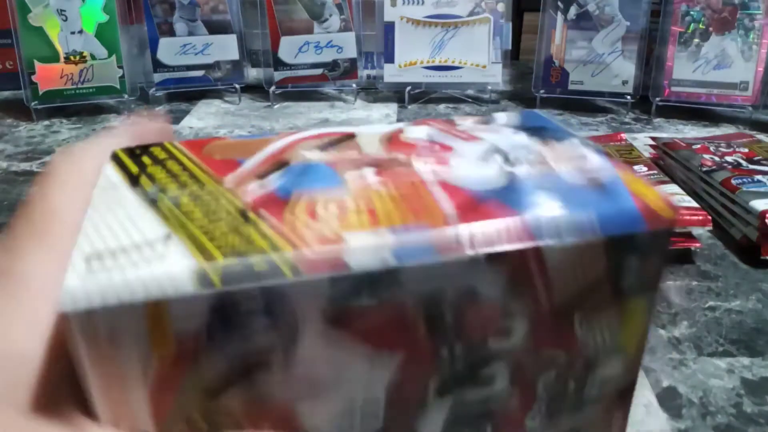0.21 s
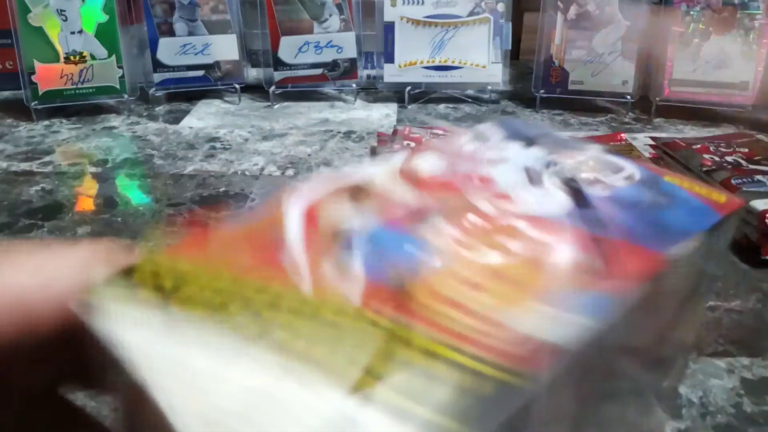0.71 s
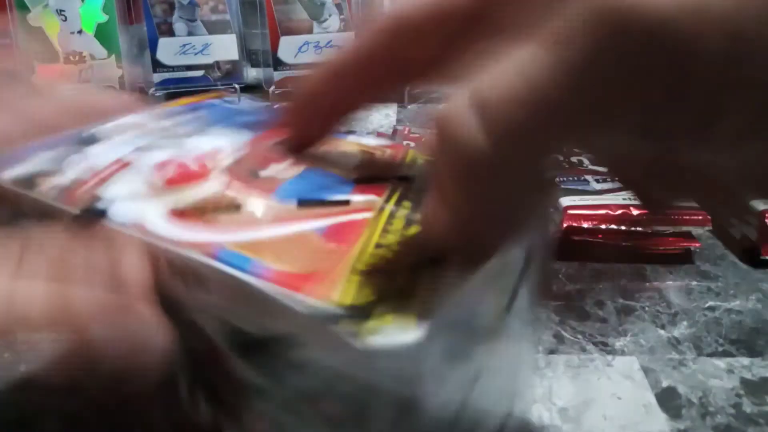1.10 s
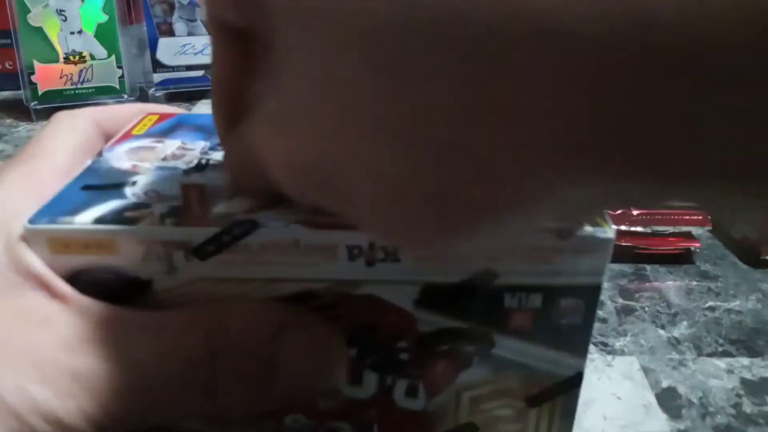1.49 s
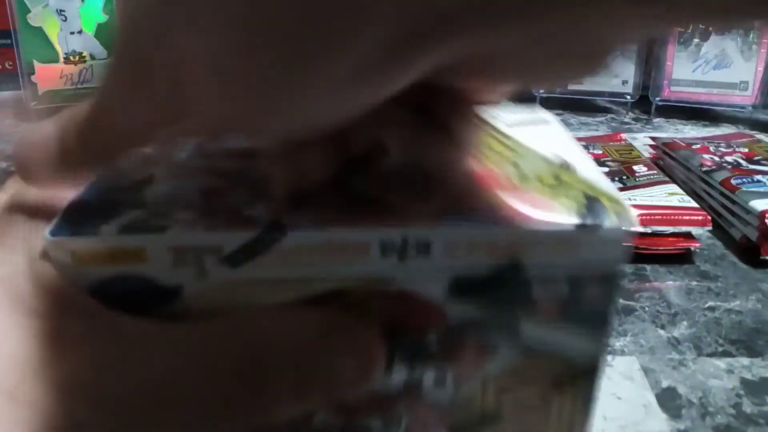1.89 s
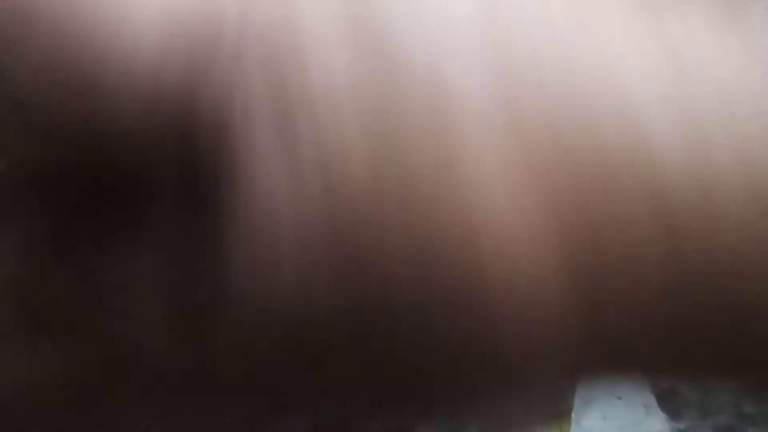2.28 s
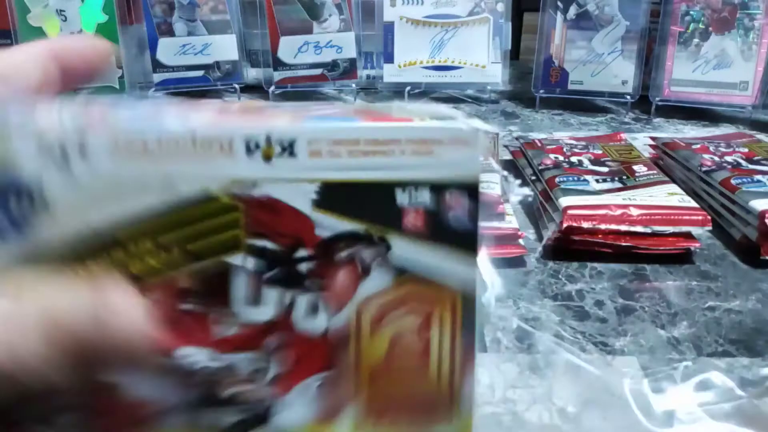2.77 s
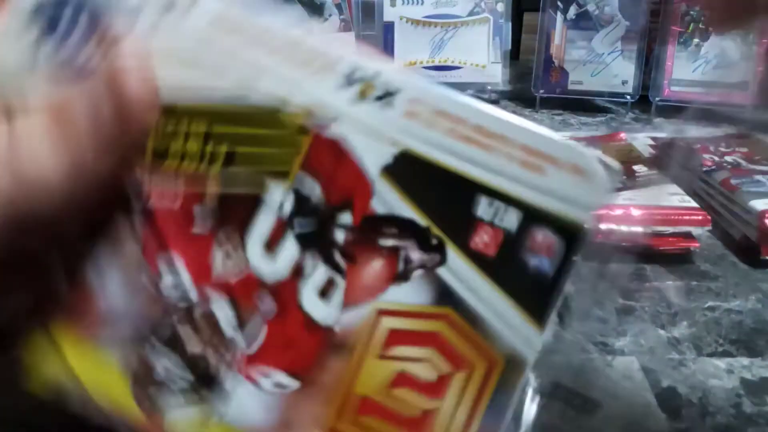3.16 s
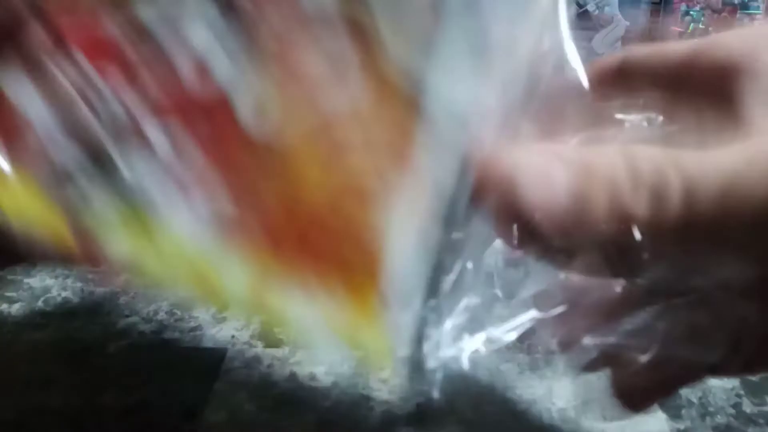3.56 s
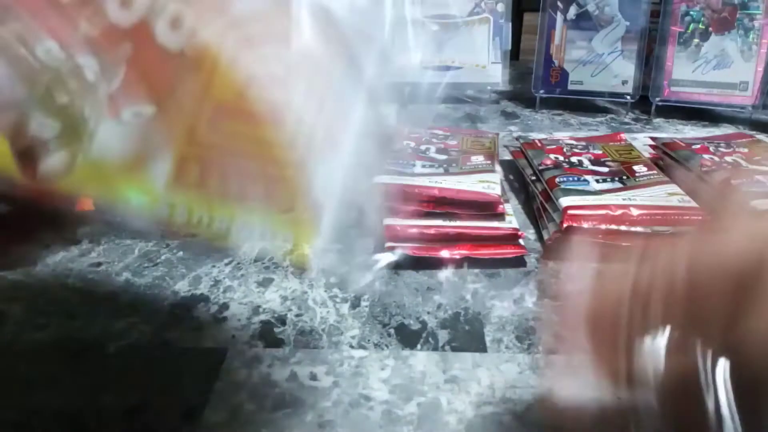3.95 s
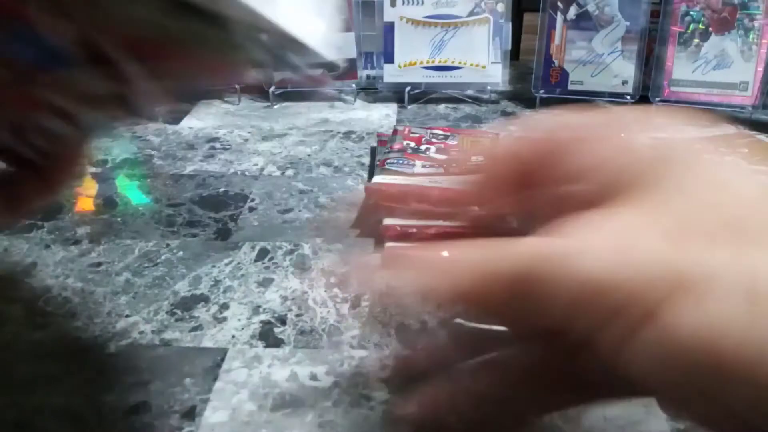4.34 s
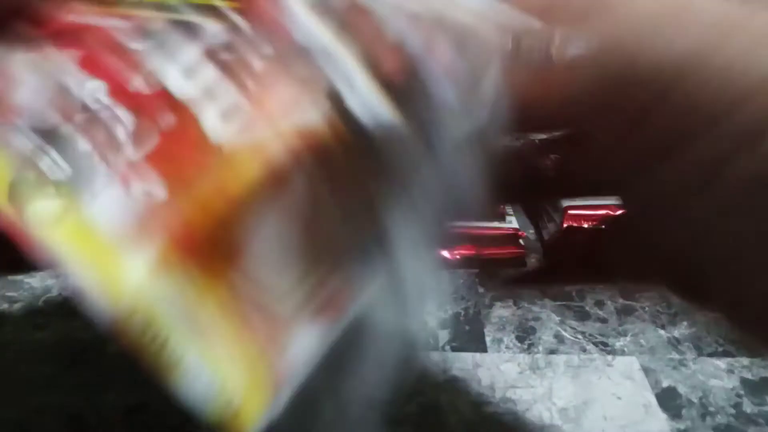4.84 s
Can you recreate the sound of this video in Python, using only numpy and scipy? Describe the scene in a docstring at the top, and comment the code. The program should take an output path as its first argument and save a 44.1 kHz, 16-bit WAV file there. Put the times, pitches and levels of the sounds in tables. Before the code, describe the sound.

Close hollow box taps and crinkles, a brief squeaky rub, then dense sharp crackling of torn plastic film, fading to sparse rustles.

```python
"""A stone table in a room with a short, dull tail; a phone microphone close to the hands.
Hands turn a film-wrapped cardboard box, pick at the film and tear it off: noise grains and short cracks
pass through resonances to make rustle, snaps and squeaks. Knocks, thumps, rubbing and sliding ring the
modes of lid and hollow box. Only the sharp hits wake the room; faint hiss lies behind,
and a noise suppressor pulls the pauses down."""
import sys
import numpy as np
from scipy import signal
from scipy.io import wavfile
from scipy.ndimage import uniform_filter1d

SR = 44100
rng = np.random.default_rng(int(sys.argv[2]) if len(sys.argv) > 2 else 0)


def dump(signal):
    """Clip the signal to [-1, 1] and save it as 16-bit WAV at the path in sys.argv[1]."""
    limited = np.clip(np.atleast_2d(signal).T, -1, 1)
    pcm = np.round(limited * 32767).astype(np.int16)
    wavfile.write(sys.argv[1], SR, pcm)


N = 222616
STEP = 32  # samples between two values of a slow curve

# pulls and slides of the film: [start t/s, hold t/s, rustle level/dB, sizzle level/dB, taut film f/Hz]
PULLS = [(0, .025, -42, -53.5, 4100), (0.048, 0.13, -56, -71, 5940), (0.294, .012, -68.5, -77, 2180),
         (0.335, 0.0062, -64, -100, 1890), (0.408, 0.011, -68, -93, 2210), (0.533, .012, -53.5, -82, 3100),
         (.578, 0.025, -47, -81.5, 2750), (0.626, .015, -43, -60, 2350), (0.678, .06, -55, -91, 2330),
         (.79, .04, -66, -68, 6100), (.835, 0.032, -55, -62, 3540), (0.877, 0.073, -46, -63, 2630),
         (0.958, 0.077, -54, -67, 3300), (1.067, 0.058, -56.5, -73, 5260), (1.176, 0.12, -64, -103, 4570),
         (1.324, .02, -57, -75, 3440), (1.383, .09, -60.5, -61.5, 4920), (1.51, .06, -72.5, -105, 4000),
         (1.592, 0.039, -54, -82, 2190), (1.828, 0.48, -52.5, -68.5, 4600), (2.414, .04, -64, -97, 3080),
         (2.462, 0.043, -56, -86, 3050), (2.496, 0.029, -45, -53, 3760), (2.575, .06, -65.5, -97, 4200),
         (2.627, .3, -54.5, -71.5, 3900), (2.975, .125, -47.5, -60, 4500), (3.15, 0.17, -57.5, -66.5, 4780),
         (3.334, .03, -54, -70, 4170), (3.39, 0.28, -68.5, -97, 5000), (3.637, .08, -58, -83, 4570),
         (3.734, .18, -50, -56, 4300), (3.967, .17, -60.5, -70, 3800), (4.156, 0.042, -47.5, -51.5, 4260),
         (4.251, 0.12, -73, -95, 5530), (4.361, 0.067, -55.5, -62.5, 4700), (4.456, 0.072, -73, -97, 5500),
         (4.549, 0.08, -58.5, -67, 5400), (4.639, 0.035, -62.5, -84, 5080), (4.872, 0.061, -71, -93, 5550),
         (4.981, 0.018, -59.5, -65, 5500), (5.024, 0.023, -53, -61, 3250)]
# loud film creases letting go: [t/s, peak level of the body/dB, pitch f/Hz]
SNAPS = [(0.0235, -28.5, 2070), (.0905, -23, 5110), (0.3073, -51, 5800), (0.339, -39, 5100),
         (0.5286, -28, 1520), (0.5763, -15.5, 3580), (0.6377, -22.5, 4830), (0.6412, -21, 2210),
         (0.7211, -30.5, 2760), (1.111, -37.5, 5700), (1.1806, -41.5, 2540), (1.3308, -36, 3420),
         (1.6236, -33, 2153), (1.818, -43.5, 4360), (1.8447, -26.5, 1910), (1.9441, -16.5, 4290),
         (1.9966, -37.5, 4400), (2.016, -31.5, 1590), (2.021, -27, 2310), (2.0836, -27, 5600),
         (2.0963, -26, 4050), (2.1445, -33.5, 2080), (2.203, -33.5, 3520), (2.2099, -22.5, 5200),
         (2.2647, -22.5, 3380), (2.276, -25.5, 2460), (2.3062, -37.5, 2700), (2.3315, -36, 4540),
         (2.4258, -35, 2420), (2.468, -34, 2660), (2.4931, -36, 3270), (2.508, -29, 1520),
         (2.5157, -19, 4800), (2.5237, -22, 2780), (2.545, -25.5, 5800), (2.6336, -35, 4440),
         (2.6794, -22, 2260), (2.762, -28.5, 3170), (2.7743, -27.5, 2800), (2.8, -35.5, 1880),
         (2.8692, -27, 5870), (2.9081, -32, 4700), (2.9708, -34.5, 3700), (2.976, -23.5, 5150),
         (2.997, -23, 5200), (3.0298, -25, 4730), (3.0573, -28.5, 5750), (3.0788, -29.5, 1530),
         (3.1008, -17, 4880), (3.2823, -32, 5800), (3.385, -40, 1620), (3.475, -48.5, 3290),
         (3.54, -52.5, 6300), (3.5639, -46, 6100), (3.6161, -40.5, 6100), (3.655, -41.5, 3400),
         (3.7308, -33, 5630), (3.7683, -28, 5770), (3.825, -34, 4010), (3.8385, -31, 3100),
         (3.884, -28, 5270), (3.8908, -25, 4870), (3.8993, -27, 6300), (3.9074, -27.5, 2520),
         (3.9247, -34.5, 2460), (3.9604, -41, 2200), (3.976, -49, 4500), (3.9854, -39, 2340),
         (4.0075, -37, 4600), (4.029, -41.5, 2970), (4.042, -44, 5640), (4.059, -45.5, 4840),
         (4.0833, -37, 3600), (4.1101, -39, 5260), (4.151, -50, 5150), (4.2029, -24.5, 6150),
         (4.3747, -43.5, 5900), (4.433, -43, 3980), (4.448, -42, 5250), (4.549, -40.5, 6020),
         (4.5963, -35, 5580), (4.6369, -45, 3220), (4.6858, -48.5, 2970), (5.031, -27, 1600)]
# middle sizzle of a snap against its body peak: [t/s, level/dB]
CRISPNESS = [(0, 12), (.1, -10.5), (.5, -31), (1.7, -29), (1.9, -23.5), (2.35, -10.5), (2.45, -52),
             (2.55, -47), (2.85, -5.5), (3.3, -26), (3.5, 2), (3.7, -10), (4.0, -5), (4.15, -8.5),
             (4.6, -5.5), (5.0, -39)]
# taps on the lid and sides: [t/s, peak level/dB, struck panel f/Hz]
KNOCKS = [(0.0148, -37, 1020), (0.026, -26, 1160), (0.091, -32.5, 1020), (0.292, -32.5, 1270),
          (0.303, -27.5, 1220), (0.331, -38, 814), (0.3381, -26, 1160), (0.348, -35, 1290),
          (0.373, -40.5, 900), (0.4112, -21.5, 630), (0.458, -45.5, 890), (0.529, -32.5, 865),
          (0.6446, -18, 830), (0.6553, -31.5, 480), (0.8902, -19.5, 730), (0.9019, -17, 530),
          (1.0242, -29, 650), (1.1176, -32.5, 715), (1.3867, -30, 775), (1.465, -35.5, 895),
          (1.5928, -40.5, 665), (1.6213, -25.5, 900), (1.8447, -27.5, 553), (1.944, -26.5, 530),
          (2.024, -22.5, 975), (2.0593, -26, 782), (2.2055, -31.5, 774), (2.2134, -27, 750),
          (2.268, -32.5, 825), (2.516, -26.5, 1340), (2.5334, -25.5, 1160), (2.5442, -44.5, 410),
          (2.6326, -32.5, 860), (2.68, -19, 910), (2.9722, -35.5, 740), (2.9966, -31, 670),
          (3.0344, -30, 1230), (3.102, -23.5, 720), (3.3339, -20.5, 537), (3.8907, -35, 740),
          (4.2036, -37.5, 595), (5.0276, -34, 620), (5.0325, -26.5, 660)]
# the whole box bumping table or palm: [t/s, peak level/dB, pitch f/Hz, settling t/s]
THUMPS = [(0.024, -37, 328, 0.037), (0.094, -46.5, 210, 0.12), (0.412, -39, 264, 0.17),
          (0.528, -37.5, 210, 0.07), (0.601, -43.5, 110, 0.071), (0.64, -28, 195, 0.15),
          (0.796, -43.5, 234, 0.042), (0.897, -26.5, 239, 0.063), (0.948, -27, 226, 0.12),
          (1.18, -37.5, 200, 0.08), (1.332, -33, 267, 0.068), (1.586, -37.5, 226, 0.087),
          (1.612, -39.5, 298, 0.049), (2.542, -33, 273, 0.08), (2.872, -42, 94, 0.15),
          (2.913, -42, 100, 0.08), (2.976, -38, 277, 0.08), (3.099, -39.5, 171, 0.11),
          (3.334, -29.5, 194.4, 0.2), (3.765, -43, 228, 0.15), (3.898, -36, 167, 0.091),
          (4.145, -43, 187, 0.067), (4.166, -40, 129, 0.2), (4.222, -34.5, 370, 0.06),
          (4.225, -37, 133, 0.081), (4.651, -38.5, 163, 0.22), (5.028, -33, 120, 0.092)]
# fingers rubbing the lid: [start t/s, hold t/s, level/dB, pressed lid f/Hz]
RUBS = [(0, 0.017, -43.5, 750), (0.072, 0.095, -66, 1090), (0.533, .055, -56.5, 760),
        (0.679, 0.056, -53, 900), (0.746, 0.058, -69, 606), (0.844, .04, -53, 595),
        (0.883, 0.072, -36, 473), (0.94, 0.2, -50, 820), (1.16, 0.17, -58.5, 690), (1.327, .012, -42, 740),
        (1.37, 0.18, -62.5, 780), (1.585, 0.027, -43, 880), (1.84, 0.013, -38.5, 604),
        (1.884, 0.25, -49.5, 790), (2.189, 0.022, -53, 750), (2.416, 0.086, -68, 850),
        (2.508, 0.035, -43.5, 826), (2.634, 0.022, -50.5, 758), (2.751, 0.16, -52.5, 1020),
        (2.966, 0.14, -51, 730), (3.13, 0.039, -55.5, 900), (3.336, 0.009, -40.5, 520),
        (3.374, 0.045, -61.5, 696), (3.62, .1, -76.5, 1300), (3.744, 0.17, -57.5, 650),
        (4.163, 0.036, -49, 576), (4.33, 0.083, -78.5, 1250), (4.655, 0.017, -63, 450)]
# the box shifting on the table: [start t/s, hold t/s, level/dB]
SHIFTS = [(0, .02, -51), (.06, 0.086, -60.5), (.535, 0.08, -54.5), (.642, 0.0074, -40.5), (.7, 0.041, -65),
          (.85, 0.024, -46), (.9, 0.081, -37.5), (.98, 0.12, -58.5), (1.15, .4, -78), (1.9, 0.077, -72.5),
          (1.99, 0.31, -77), (2.465, 0.032, -67), (2.51, 0.021, -55), (2.64, 0.015, -64.5),
          (2.85, .14, -66), (3.01, 0.13, -52), (3.715, 0.16, -70), (4.16, 0.076, -53),
          (4.648, 0.042, -57.5), (4.88, 0.17, -84.5)]
# narrow tones of sliding film or card: [from t/s, to t/s, pitch f/Hz, resonator width f/Hz, top level/dB]
SQUEAKS = [(.84, 1.06, 1740, 110, -55), (.865, 1.0, 2160, 120, -56), (.86, 1.05, 2910, 170, -51),
           (.828, 1.06, 3480, 170, -53), (3.34, 3.63, 4850, 900, -63), (1.63, 1.77, 890, 120, -70),
           (2.335, 2.47, 910, 150, -66), (3.634, 3.665, 1365, 120, -61), (4.23, 4.4, 1460, 90, -72),
           (4.866, 4.99, 1720, 300, -70), (4.866, 4.9, 1800, 150, -63), (4.866, 4.97, 4750, 250, -75),
           (4.866, 4.95, 452, 60, -75)]
# modes of the lid, then of the hollow box: [f/Hz, relative level/dB, free ringing to -60 dB t/s]
LID_MODES = [(487, -12.5, 0.023), (549.4, 2.5, 0.11), (708, 4, 0.043), (792, 8, 0.047), (991, 0.5, 0.047),
             (1254, 1.5, 0.08)]
HOLLOW_MODES = [(89.1, -21, 0.54), (120.4, -12.5, 0.21), (207.2, -10, .14), (230, 1.5, 0.061),
                (297, 2.5, 0.11)]
# crossovers between the bands of the suppressor: [f/Hz]
SUPPRESS_EDGES_HZ = [380, 1300, 3500, 8000]

# every move swells, holds and dies away: (swell dB per s, dying dB per s, level at rest dB)
PULL_SHAPE, SIZZLE_SHAPE = (1600, 298, -93), (2400, 650, -105)
RUB_SHAPE, SHIFT_SHAPE = (1800, 420, -96.5), (790, 330, -91)
# a hit leaves its own friction sound going for a moment: (dB under the hit, dying dB per s)
AFTER_SNAP, AFTER_KNOCK, AFTER_THUMP = (26.7, 550), (21, 1800), (16, 400)
SLACK_FILM_HZ, RESTING_LID_HZ = 5400, 1200
CRISPNESS_SPREAD_DB = 7.5  # standard deviation from snap to snap
# small random snaps, only while the film is torn and pulled hard enough
TICKS_PER_S, TICK_OVER_RUSTLE_DB, TICK_SPREAD_DB = 40, 9, 7
TEARING_FROM_S, TICKS_ABOVE_DB = 1.82, -63
# microphone port (width of each of two stages), low limit of the microphone, top cut
PORT_HZ, PORT_WIDTH_HZ, PORT_DB = 15000, 2300, 11.5
MIC_LOW_HZ, CUTOFF_HZ = 69.4, 16300
ROOM_T60_S, ROOM_DB, HISS_DB = 0.11, -18.5, -99
# suppressor: threshold, extra dB down per dB under it, smoothing time
SUPPRESS_BELOW_DB, SUPPRESS_SLOPE, SUPPRESS_S = -88, 0.11, .015


def rustle(body_db, sizzle_db, taut_hz):
    """Creases over smooth sliding ring flickering patches of film, those near the taut pitch most."""
    # harder handling crackles more and rings patches further from the taut pitch
    crackle = np.clip((body_db + 72) / 22, .2, 1)
    creases = crackle * grains(per_s=380, spread_db=4.2, grain_s=.0007)
    sliding = rng.standard_normal(N)
    friction = creases + .6 * sliding
    body = np.zeros(N)
    for k, hz in enumerate(np.geomspace(1350, 6600, 14)):
        near_db = nearness_db(hz, taut_hz, db_per_octave=11.5 - 8.8 * crackle)
        flicker_db = 4.1 * drift(per_s=14.0)
        patch = rms_one(resonate_twice(friction, hz, 0.19 * hz))
        body += (-1) ** k * from_db(near_db + flicker_db) * patch
    return from_db(body_db) * evened(body) + from_db(sizzle_db) * evened(sizzle(friction))


def snaps(table):
    """A crease gives way in under a millisecond with a pitch of its own, then rattles for a few more."""
    out, t = np.zeros(N), np.arange(700) / SR
    crispness_draws = rng.standard_normal(len(table))
    noise = rng.standard_normal((len(table), len(t)))
    onset = 1 - np.exp(-t / 0.00029)
    shape = onset * (np.exp(-t / 0.00026) + .12 * np.exp(-t / 0.0028))
    for (s, db, hz), white, draw in zip(table, noise, crispness_draws):
        crack = white * shape
        pitched = 5.8 * resonate(crack, hz, 0.12 * hz)
        body = band(band(crack, 1100, 4700) + pitched, 1100, 6000)
        sizzle_db = db + crispness_db(s) + CRISPNESS_SPREAD_DB * draw
        add(out, s, from_db(db) * peak_one(body) + from_db(sizzle_db) * peak_one(sizzle(crack)))
    return out


def ticks(film_db):
    """Small snaps at random moments, sized by the rustle around them."""
    when, size, pitch, chance = rng.random((4, 400))
    at = (when * N).astype(int)
    db = film_db[at] + TICK_OVER_RUSTLE_DB + TICK_SPREAD_DB * (2 * size - 1)
    hz = 1800 * 4.5 ** pitch
    chosen = chance < TICKS_PER_S * N / SR / len(chance)
    heard = chosen & (at > TEARING_FROM_S * SR) & (film_db[at] > TICKS_ABOVE_DB)
    return list(zip(at[heard] / SR, db[heard], hz[heard]))


def sizzle(x):
    """The treble from 6.8 kHz up, lifted at the resonance of the microphone port."""
    return band(x, 6800, 21000) + from_db(PORT_DB) * resonate_twice(x, PORT_HZ, PORT_WIDTH_HZ)


def crispness_db(s):
    """Middle sizzle of a snap against its body peak at a given time."""
    return np.interp(s, *np.transpose(CRISPNESS))


def blows(table, modes, share, softness, grit):
    """A contact of under one cycle, then gritty settling, rings the struck panel and modes near its pitch."""
    out, t = np.zeros(N), np.arange(round(.25 * SR)) / SR
    strengths = from_db(rng.normal(0, 3.5, (len(table), len(modes))))
    noise = rng.standard_normal((len(table), len(t)))
    for (s, db, hz, settle_s), gains, white in zip(table, strengths, noise):
        push = grit * white * np.exp(-np.log(1000) * t / settle_s)
        width = max(round(softness * SR / hz), 3)  # softness is the contact in cycles
        push[:width] += np.hanning(width)
        sound = ring(push, hz, 9.4 / hz)
        for (mode_hz, mode_db, mode_t60), gain in zip(modes, gains):
            near_db = nearness_db(mode_hz, hz, db_per_octave=5.0)
            sound += share * gain * from_db(mode_db + near_db) * ring(push, mode_hz, mode_t60)
        add(out, s, from_db(db) * peak_one(band(sound, 0.47 * hz, 2.7 * hz)))
    return out


def knocks():
    """Taps ring the lid modes and settle in 24 cycles of the struck panel."""
    table = [(s, db, hz, 24.0 / hz) for s, db, hz in KNOCKS]
    return blows(table, LID_MODES, share=0.063, softness=0.4, grit=0.52)


def thumps():
    """Softer, grittier contacts of the whole box ring its hollow modes."""
    return blows(THUMPS, HOLLOW_MODES, share=0.3, softness=.6, grit=1.6)


def rubbing(lid_db, lid_hz):
    """Uneven slips of skin on card ring the lid modes, damped, most those near the pressed pitch."""
    skin = grains(per_s=220, spread_db=1.0, grain_s=0.0032)
    lid = np.zeros(N)
    for hz, db, t60 in LID_MODES:
        near_db = nearness_db(hz, lid_hz, db_per_octave=28.0)
        lid += from_db(db + near_db) * rms_one(ring(skin, hz, 0.21 * t60))
    return from_db(lid_db) * evened(band(lid, 570, 1400))


def shifting(shift_db):
    """Steady friction of card on stone rings the hollow modes, damped, each drifting in level."""
    stone = rng.standard_normal(N)
    hollow = np.zeros(N)
    for hz, db, t60 in HOLLOW_MODES:
        hollow += from_db(db + 7.3 * drift(per_s=5.2)) * ring(stone, hz, 0.38 * t60)
    return from_db(shift_db) * evened(band(hollow, 65, 570))


def squeaks():
    """Friction noise through a narrow resonance; it catches quickly and lets go slowly."""
    out = np.zeros(N)
    for start, stop, hz, width_hz, db in SQUEAKS:
        phase = np.linspace(0, 1, round((stop - start) * SR))
        white = rng.standard_normal(len(phase))
        tone = rms_one(resonate_twice(white, hz, width_hz))
        add(out, start, from_db(db) * np.sin(np.pi * phase ** 0.45) ** .7 * tone)
    return out


def room(x):
    """A short dying tail of reflections, dull on top, starting 4 ms after the direct sound."""
    t = np.arange(round(.3 * SR)) / SR
    reflections = band(rng.standard_normal(len(t)), 150, 9800)
    tail = reflections * from_db(-60 * t / ROOM_T60_S) * (t > .004)
    return from_db(ROOM_DB) * signal.fftconvolve(x, tail / np.sqrt(np.sum(tail ** 2)))[:N]


def hiss():
    """Faint steady white noise."""
    return from_db(HISS_DB) * rng.standard_normal(N)


def suppress(x):
    """Sound under a threshold is turned further down."""
    r = np.exp(-1 / (SUPPRESS_S * SR))
    power = signal.lfilter([1 - r], [1, -r], x ** 2, zi=[[1e-4]])[0]  # starts from about -40 dB
    level_db = 10 * np.log10(power + 1e-14)
    return x * from_db(SUPPRESS_SLOPE * np.minimum(level_db - SUPPRESS_BELOW_DB, 0))


def handling():
    """Levels and pitches of film, lid and sliding box over time, from the moves and the hits."""
    pulls = moves(PULLS, PULL_SHAPE)
    film_db = level(np.vstack([pulls, after(SNAPS, AFTER_SNAP)]))
    taut_hz = leading(pulls, [row[4] for row in PULLS] + [SLACK_FILM_HZ])

    sizzles = moves([(s, hold, db) for s, hold, _, db, _ in PULLS], SIZZLE_SHAPE)
    crisp = [(s, db + crispness_db(s)) for s, db, hz in SNAPS]
    sizzle_db = level(np.vstack([sizzles, after(crisp, AFTER_SNAP)]))

    lid = np.vstack([moves(RUBS, RUB_SHAPE), after(KNOCKS, AFTER_KNOCK)])
    lid_pitches = [row[3] for row in RUBS] + [RESTING_LID_HZ] + [row[2] for row in KNOCKS]
    lid_hz = leading(lid, lid_pitches)

    shift_db = level(np.vstack([moves(SHIFTS, SHIFT_SHAPE), after(THUMPS, AFTER_THUMP)]))
    return film_db, sizzle_db, taut_hz, level(lid), lid_hz, shift_db


def moves(table, shape):
    """Power of each move over time, one value a STEP; the last row is the power at rest."""
    swell, dying, rest_db = shape
    t = np.arange(0, N + STEP, STEP) / SR
    start, hold, db = np.array([row[:3] for row in table]).T[:, :, None]
    db = db - swell * np.maximum(start - t, 0) - dying * np.maximum(t - start - hold, 0)
    return from_db(2 * np.vstack([db, rest_db + 0 * t]))  # doubled dB: power, not amplitude


def after(hits, rule):
    """Power of the friction that each hit sets off."""
    under_db, dying = rule
    table = [(row[0], 0, row[1] - under_db) for row in hits]
    return moves(table, (6000, dying, -140))[:-1]  # without the row at rest


def level(power):
    """Summed level in dB."""
    return full(10 * np.log10(power.sum(axis=0)))


def leading(power, values):
    """Average of the values weighted by power, so the loudest move leads."""
    return full(np.dot(values, power) / power.sum(axis=0))


def full(slow):
    """A slow curve drawn out to one value a sample."""
    return np.interp(np.arange(N) / STEP, np.arange(len(slow)), slow)


def grains(per_s, spread_db, grain_s):
    """Random slips of uneven size, each a short dying puff of noise; rms 1."""
    born = rng.random(N) < per_s / SR
    power = born * from_db(2 * spread_db * np.minimum(rng.exponential(1, N), 3))
    r = np.exp(-1 / (grain_s * SR))
    envelope = np.sqrt(signal.lfilter([1], [1, -r], power + 1e-18))
    return rms_one(envelope * rng.standard_normal(N))


def drift(per_s):
    """Slow random wander between knots of standard deviation 1."""
    knots = rng.standard_normal(int(N / SR * per_s) + 2)
    return np.interp(np.arange(N) / SR * per_s, np.arange(len(knots)), knots)


def nearness_db(hz, centre_hz, db_per_octave):
    """Level falls with the distance from a centre pitch."""
    return -db_per_octave * np.abs(np.log2(hz / centre_hz))


def ring(push, hz, t60):
    """A damped mode: a unit click sets a sine of height 1 ringing."""
    r, w = from_db(-60 / (t60 * SR)), 2 * np.pi * hz / SR
    return signal.lfilter([0, np.sin(w)], [1, -2 * r * np.cos(w), r * r], push + 1e-18)


def resonate(x, hz, width_hz):
    """Two-pole resonance with gain 1 on top."""
    r, w = np.exp(-np.pi * width_hz / SR), 2 * np.pi * hz / SR
    return signal.lfilter(np.array([1, 0, -1]) * (1 - r * r) / 2, [1, -2 * r * np.cos(w), r * r], x)


def resonate_twice(x, hz, width_hz):
    """Two equal resonances in a row, for steeper sides."""
    return resonate(resonate(x, hz, width_hz), hz, width_hz)


def band(x, low_hz, high_hz):
    """Butterworth band-pass, its upper edge held below 0.45 of the sample rate."""
    edges = [low_hz, min(high_hz, .45 * SR)]
    return signal.sosfilt(signal.butter(2, edges, "band", fs=SR, output="sos"), x)


def evened(x):
    """Level 1 over every tenth of a second."""
    return x / np.sqrt(uniform_filter1d(x ** 2, size=SR // 10) + 1e-20)


def rms_one(x):
    """Scaled to rms 1."""
    return x / np.sqrt(np.mean(x ** 2) + 1e-20)


def peak_one(x):
    """Scaled to peak 1."""
    return x / np.abs(x).max()


def from_db(db):
    """Gain of a level in dB."""
    return 10 ** (np.asarray(db) / 20)


def add(out, s, sound):
    """Mixes a sound in at a time in seconds."""
    i = round(s * SR)
    out[i:i + len(sound)] += sound[:N - i]


def scene():
    """Film and box close by; the sharp hits also wake the room."""
    film_db, sizzle_db, taut_hz, lid_db, lid_hz, shift_db = handling()
    film = rustle(film_db, sizzle_db, taut_hz)
    friction = rubbing(lid_db, lid_hz) + shifting(shift_db) + squeaks()
    hits = snaps(SNAPS + ticks(film_db)) + knocks() + thumps()
    return (film + friction + hits + room(hits) + hiss())[None]


def record(dry):
    """The microphone drops the deep bass, the suppressor works band by band, the top is cut."""
    rest = signal.sosfilt(signal.butter(3, MIC_LOW_HZ, "high", fs=SR, output="sos"), dry)
    kept = 0
    for hz in SUPPRESS_EDGES_HZ:
        low = signal.sosfilt(signal.butter(2, hz, fs=SR, output="sos"), rest)
        kept = kept + suppress(low)
        rest = rest - low
    top_cut = signal.cheby2(12, 60, CUTOFF_HZ, fs=SR, output="sos")
    return signal.sosfilt(top_cut, kept + suppress(rest))


dry = scene()
out = record(dry)
dump(out)
```